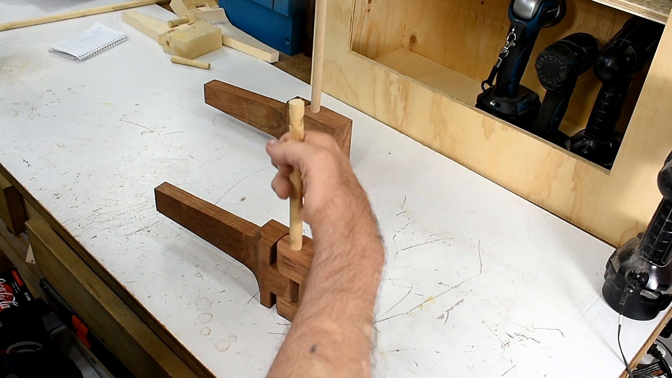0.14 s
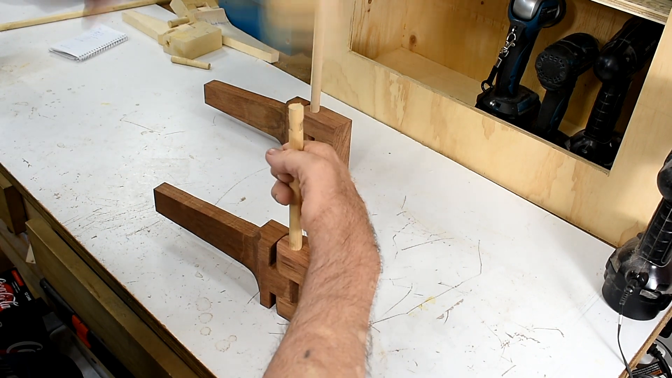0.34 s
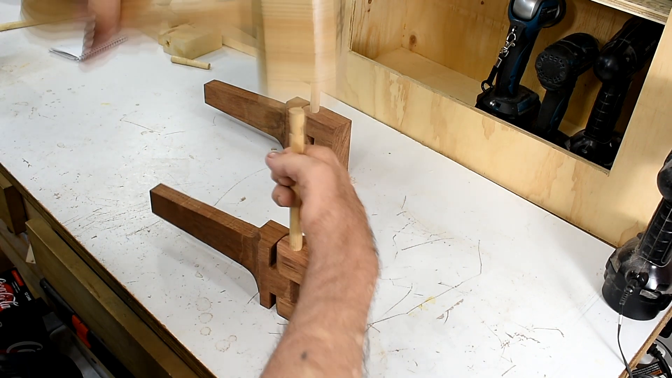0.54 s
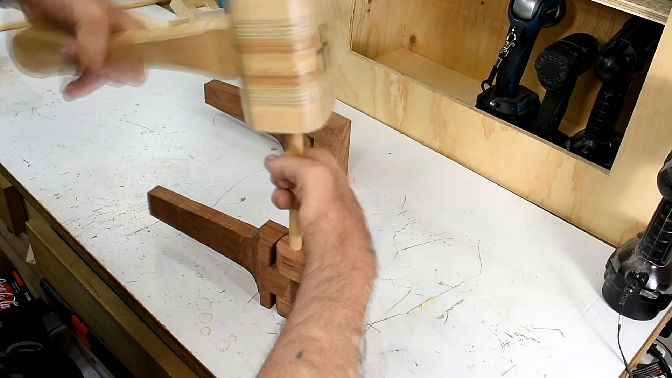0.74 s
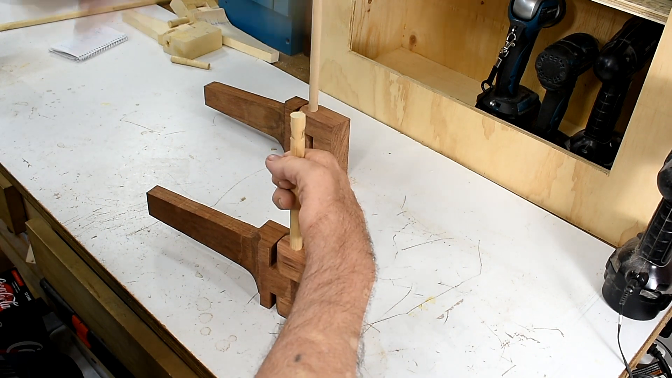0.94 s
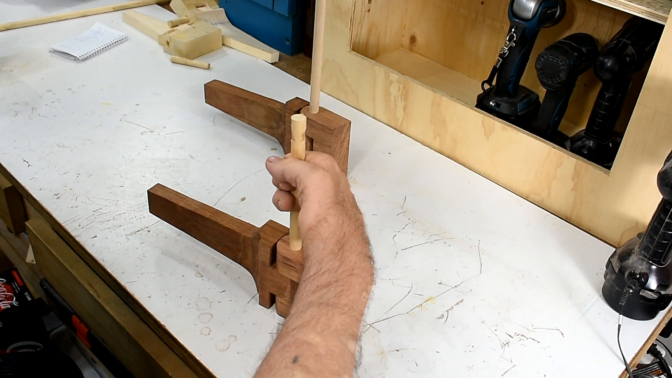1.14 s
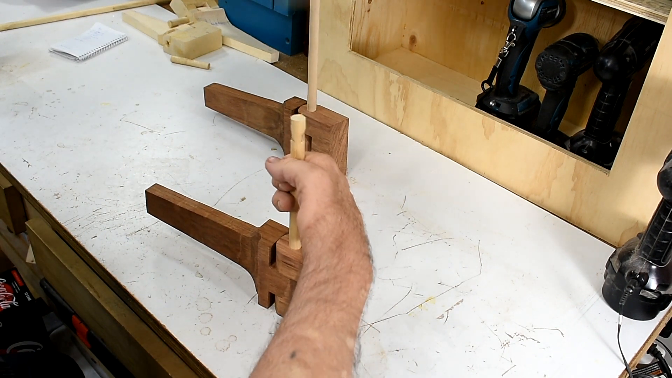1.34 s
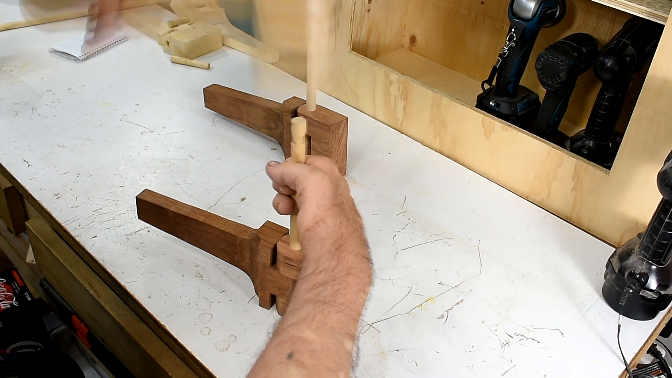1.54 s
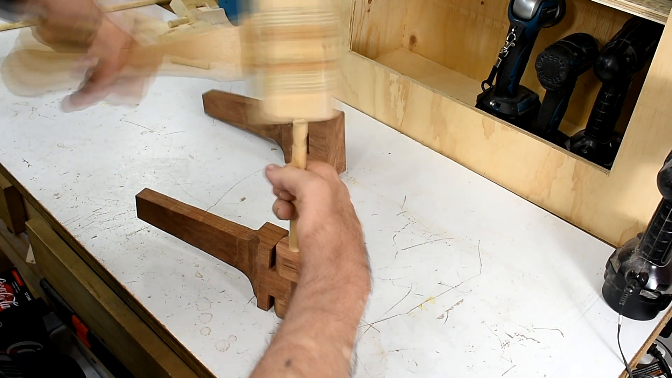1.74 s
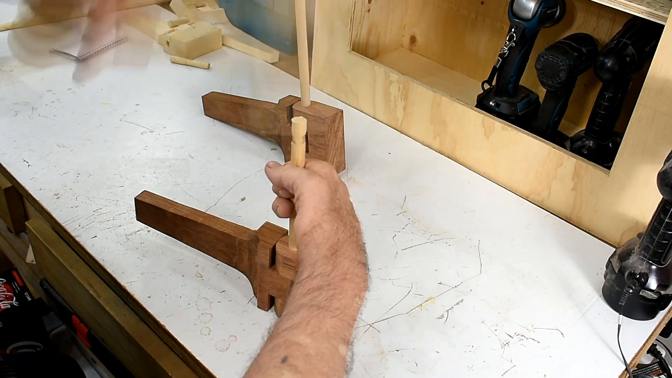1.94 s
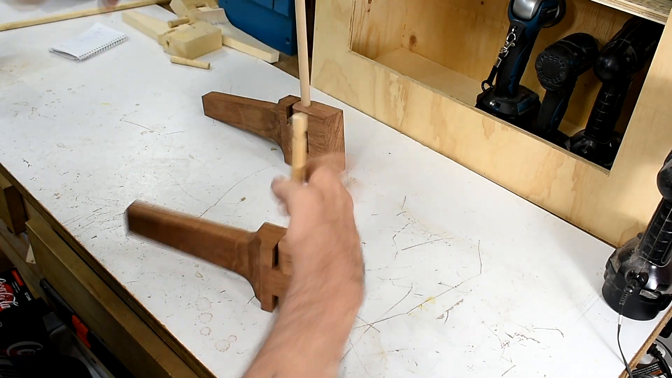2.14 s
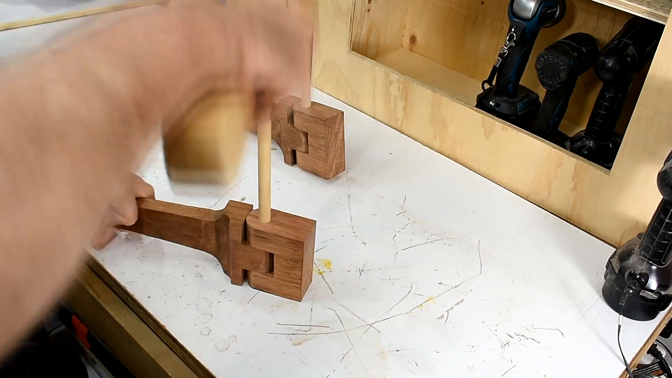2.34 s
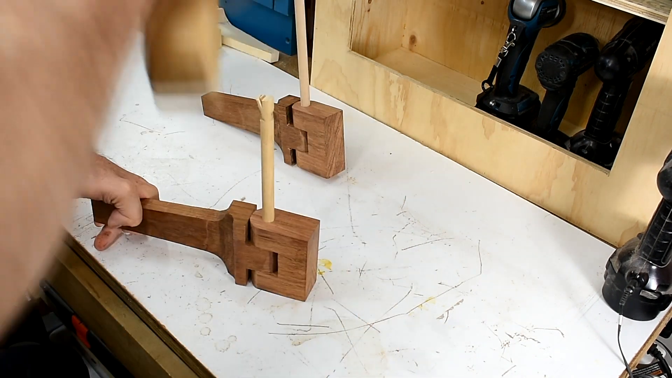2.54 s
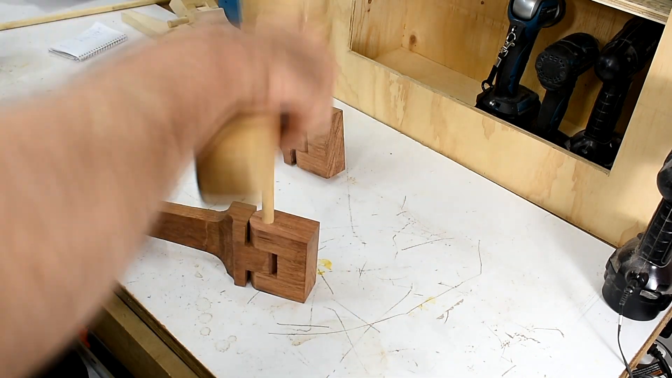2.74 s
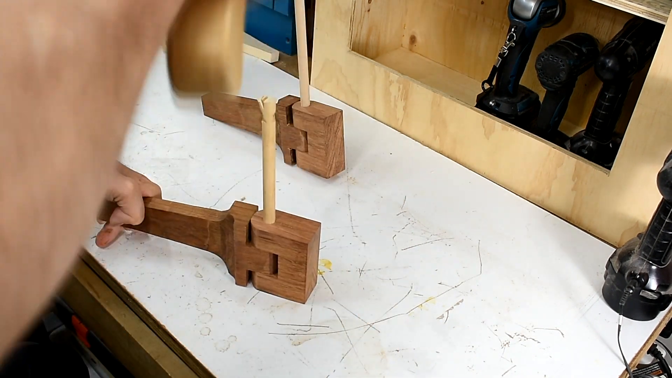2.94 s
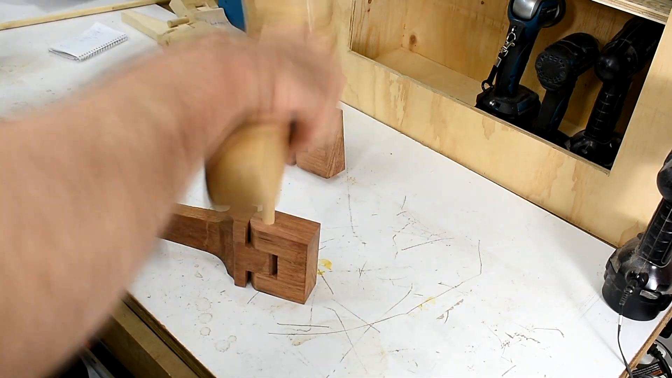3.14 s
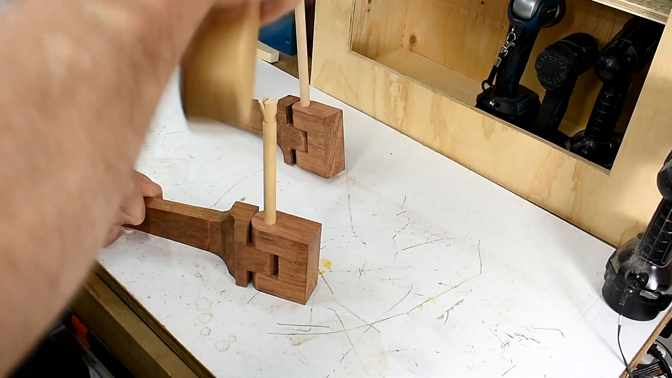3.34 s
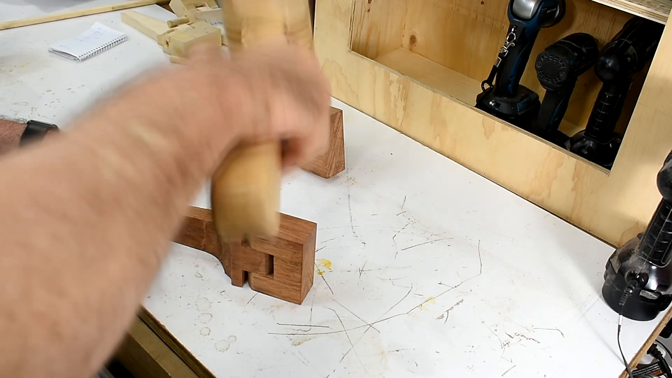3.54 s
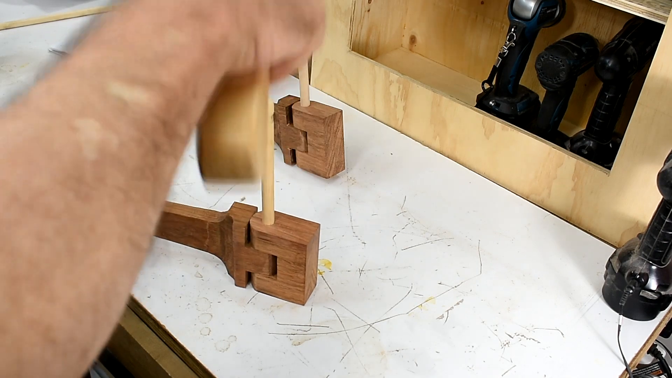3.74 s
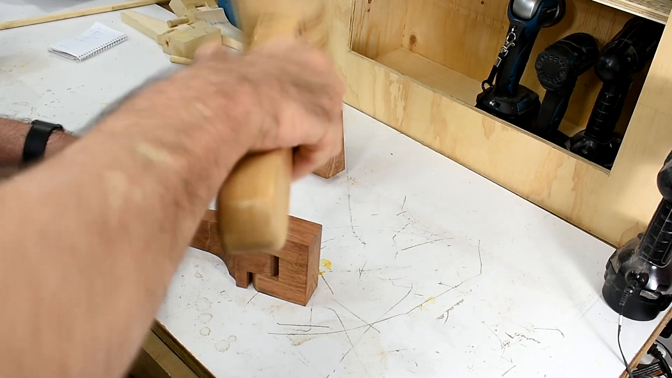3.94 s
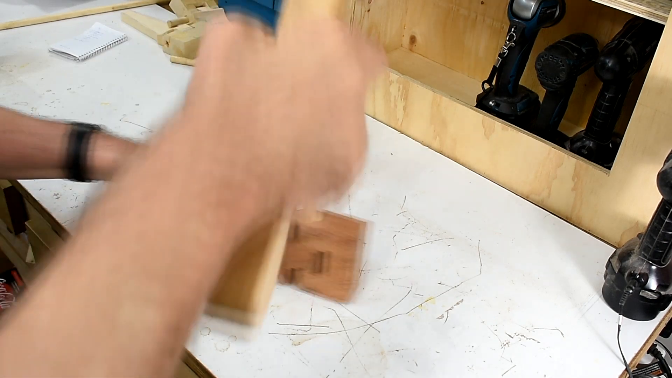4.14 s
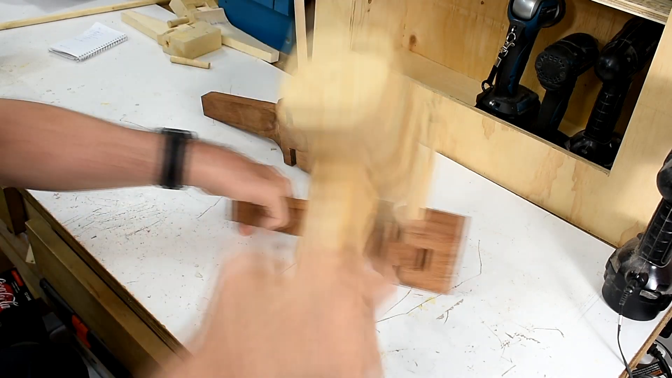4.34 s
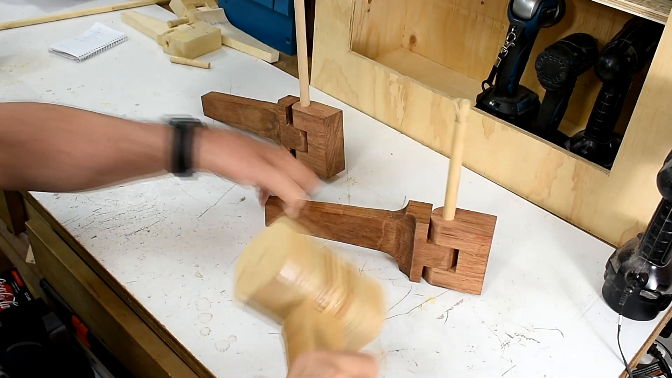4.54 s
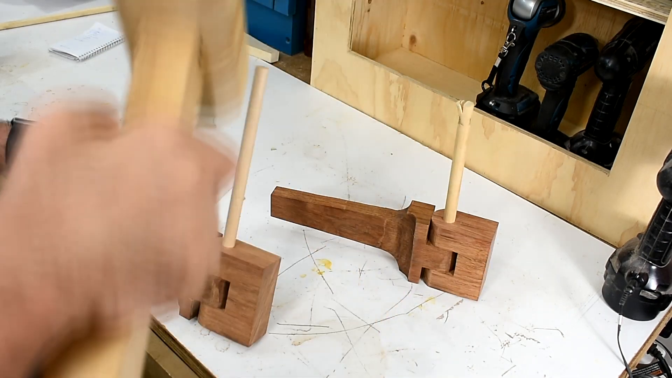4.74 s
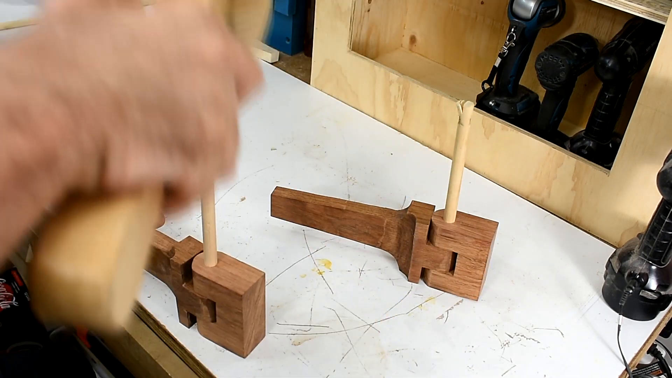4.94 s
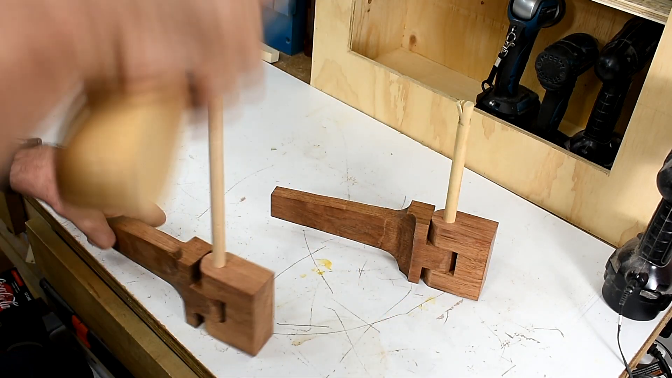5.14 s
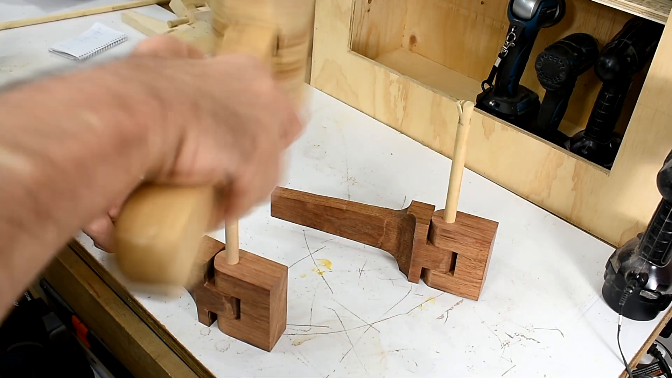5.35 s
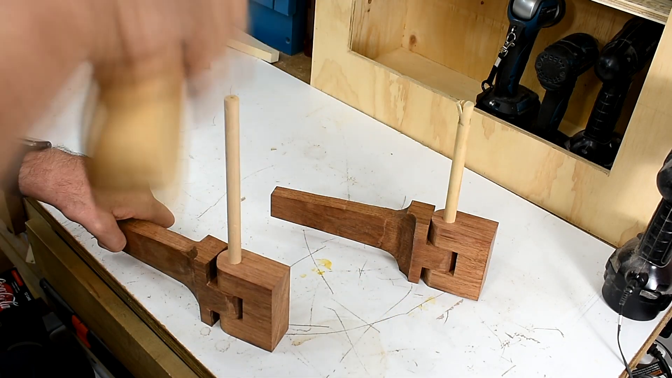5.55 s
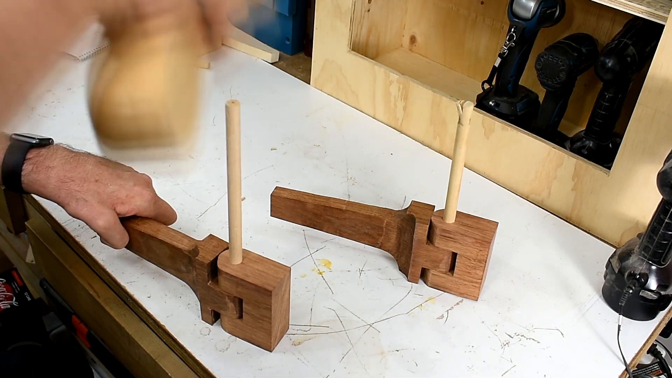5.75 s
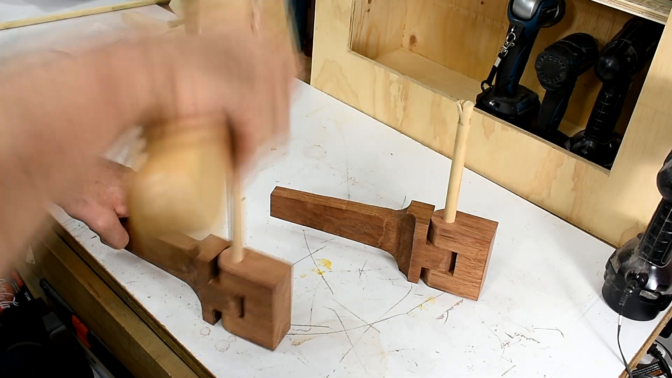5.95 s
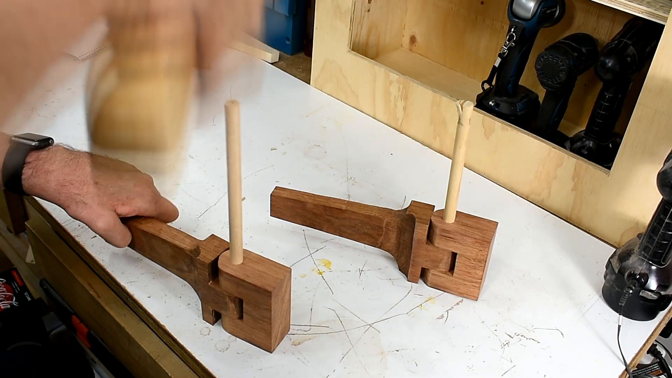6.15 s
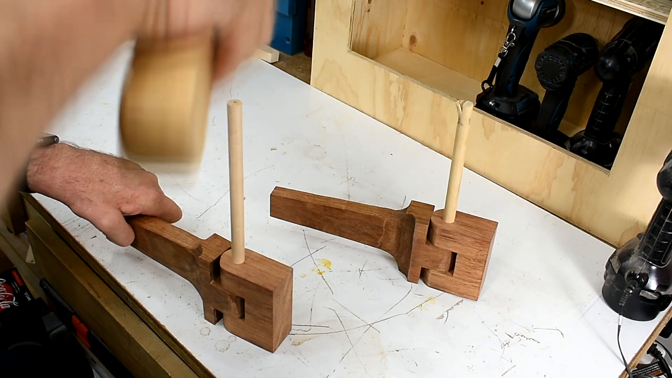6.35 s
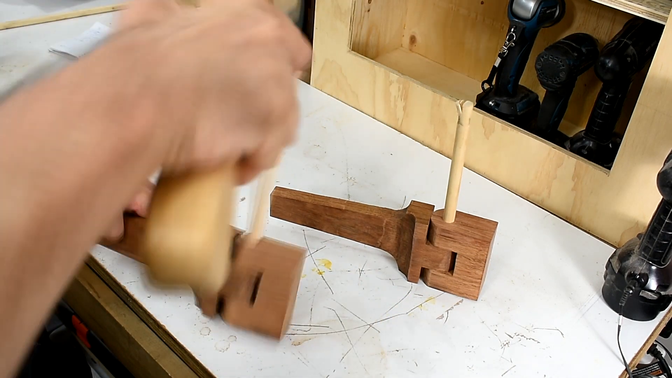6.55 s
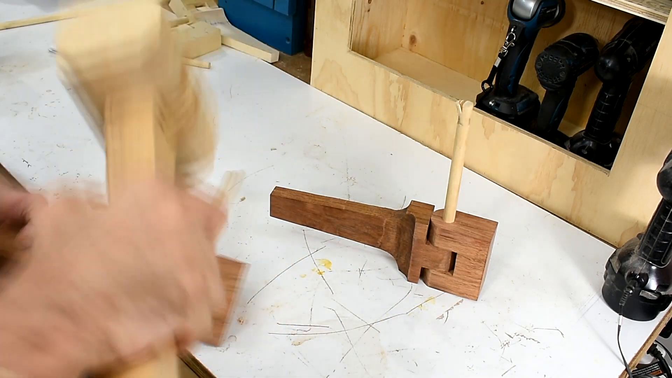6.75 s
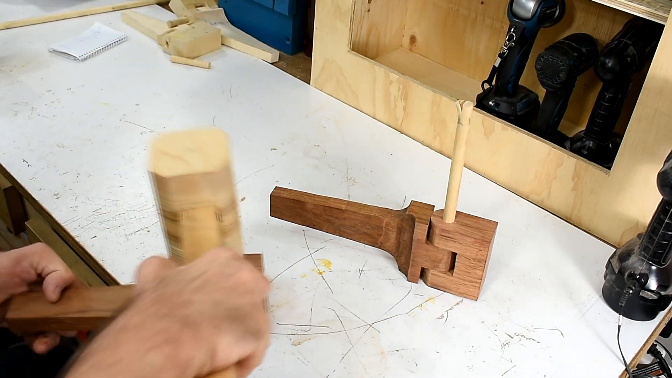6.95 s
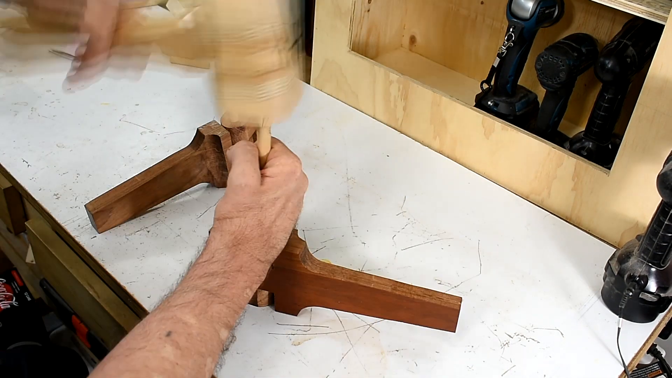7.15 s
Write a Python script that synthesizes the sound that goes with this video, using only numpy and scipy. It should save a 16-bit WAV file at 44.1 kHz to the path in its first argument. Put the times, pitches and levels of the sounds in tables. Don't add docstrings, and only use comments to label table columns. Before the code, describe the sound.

Close, mono, overloaded wooden hammering: a brisk run of bright taps with clipped, shortened tails, a slower run of deep hollow knocks, a few moments of sliding and setting down wood with a sharp glancing clack, then a final hurried run of heavier thuds. Every jolt makes loose metal tools buzz and hop on the bench. Short room reflections and a faint steady hum and hiss fill the gaps.

```python
import sys
import numpy as np
from scipy import signal
from scipy.fft import rfft, irfft
from scipy.io import wavfile
from scipy.ndimage import uniform_filter1d

SR = 44100
rng = np.random.default_rng(int(sys.argv[2]) if len(sys.argv) > 2 else 0)


def store_wav(level_fs):
    pcm = np.round(np.clip(np.atleast_2d(level_fs), -1, 1) * 32767)
    wavfile.write(sys.argv[1], SR, pcm.T.astype(np.int16))


def gain_from_db(level_db):
    decades = np.asarray(level_db, float) / 20
    return 10 ** decades


N = 317079

# pitch in Hz, t60 in seconds, level in dB in the first, second and third run.
BENCH_MODES = [(105, .3, -17.5, -11, -17), (147, .35, -8, -11, -1.5), (170.35, 0.29, -7.5, -13, 1),
               (237, 0.086, -13.5, 1.5, -6.5), (277.24, .3, -1, -12, 0), (347.3, 0.32, -1.5, 1, -1.5),
               (400, 0.081, -6, 10, -11), (450.5, 0.21, -3.5, -6.5, -3.5), (559, 0.29, 5.5, -1, -9),
               (706.6, 0.34, -7.5, -3.5, -27.5), (857, 0.34, 2, -1, -4.5), (924, 0.35, -2, -3, -3),
               (1148, 0.37, 0.5, 0.5, -9.5), (1303, 0.28, -2, -13, -6.5), (1429, 0.2, -6, -7.5, -2.5)]
# centre in Hz, width in Hz, level in dB.
TOOL_LOW = [(882, 110, -13), (1523, 71, -6.5), (1699, 36, -7), (2157.5, 150, -1.5), (2344, 100, -1),
            (2606, 150, -10)]
# centre in Hz, width in Hz, level in dB.
TOOL_HIGH = [(3146, 120, 2), (3467, 120, -8.5), (4700, 260, -24.5), (5260, 280, -20.5)]
# start in seconds, ring in dB, upper ring in dB, rattle t60 in seconds.
LANDINGS = [(0.2225, -26, -9, 0.056), (0.458, -28.5, -24, 0.067), (0.6938, -27.5, -11.5, 0.15),
            (0.9381, -25.5, 2, 0.17), (1.193, -27, 3, 0.18), (1.431, -21, -23, 0.13),
            (1.662, -32, -13, 0.096), (1.913, -29, -13, .12), (2.2602, -29.5, 7.5, 0.2),
            (2.667, -30, 2.5, 0.12), (2.944, -27, 9.5, 0.08), (3.3774, -29, -4, 0.24),
            (3.7722, -24, -12, 0.2), (4.066, -37, 21, 0.078), (4.2932, -28.5, -21, 0.049),
            (4.4283, -33, 3, 0.098), (4.6042, -29, 9.5, 0.18), (4.953, -45, 8.5, 0.11), (5.1, -42, 4, 0.12),
            (5.2403, -31.5, 1.5, 0.28), (5.3481, -19, 5.5, 0.29), (5.4185, -35.5, 23.5, 0.09),
            (5.548, -26.5, -8.5, 0.15), (5.575, -35.5, -7, 0.091), (5.82, -22.5, -4, 0.095),
            (6.104, -27, 4.5, 0.23), (6.381, -22, -8.5, 0.13), (6.6373, -45, 8, 0.25),
            (6.733, -25, -7, 0.16), (7.16, -37, -12, 0.11)]
# lower modes, 2.1 kHz mode, 2.4 kHz mode, crack, all in dB.
TOOL_LIE = [(-2.5, -1, 5.5, 4), (4.5, 3.5, -7, 7), (2, -1.5, 0.5, 1), (2.5, 4, 6, 4), (-3, -1.5, 1.5, 1),
            (-8.5, -1, 1, 3.5), (-1.5, -0.5, -3.5, 6), (1, 0, 1, -3.5), (-2.5, -2, 0, 4.5),
            (1.5, -4, -2.5, -6), (8, -10.5, 7, -5), (2, -5, 0.5, 0.5), (3.5, -3.5, 2.5, -1.5),
            (-8, -3, 3, 0), (3.5, 2, 6, 2), (7, -5, -11, 0), (-0.5, -2.5, -17, 8), (4, -1, -1, -0.5),
            (10.5, 3, -12, -6), (8, 0.5, 3, -9), (4, 2.5, 0, -4.5), (-2.5, -4, -13.5, -6),
            (5.5, -1.5, -3.5, -7.5), (8, -1, 6, -12.5), (5.5, -0.5, -4, -0.5), (7, -2, -1, 1),
            (2.5, -2.5, -1, 1), (-6, -8, -1, -3), (4, -2, -2.5, -7), (-4, -0.5, -5, 5)]
# start in seconds, ring in dB.
GLANCE = (5.3672, -13)
LEAD_BENDS = [0.33, 2.37, 2.6, 0.99, 2.53, 1.4, 1.7, 2.6, .95, 0.38, .42, 3.75, 0.22, .16]


def unit(x):
    return x / np.sqrt(np.mean(x ** 2))


def on_log_axis(table, hz):
    points_hz, values = np.transpose(table)
    return np.interp(np.log(np.maximum(hz, 1)), np.log(points_hz), values)


def band(x, low_hz, high_hz):
    return signal.sosfilt(signal.butter(2, [low_hz, high_hz], "bandpass", fs=SR, output="sos"), x)


def resonate(x, peaks):
    out = 0
    for hz, width_hz, db in peaks:
        b, a = signal.iirpeak(hz, hz / (2.2 * width_hz), fs=SR)
        out = out + gain_from_db(db) * signal.lfilter(b, a, signal.lfilter(b, a, x))
    return out


def add(out, x, s):
    i = int(round(s * SR))
    out[i:i + len(x)] += x[:N - i]


def rings(modes, t, scatter_db=2.0):
    ring = np.zeros(len(t))
    for hz, db, t60_s in modes:
        gain, detune, phase, beat_phase = rng.standard_normal(4)
        level = gain_from_db(db + scatter_db * gain - 60 * t / min(t60_s, .33))
        beat = 1 + 0.61 * np.sin(2 * np.pi * .025 * hz * t + 3 * beat_phase)
        ring += level * beat * np.sin(2 * np.pi * hz * (1 + .006 * detune) * t + .5 * phase)
    return ring / np.std(ring[:SR // 50])


def air():
    # frequency in Hz, density in dB per Hz.
    colour = [(18, -21), (30, -6), (60, -3), (140, -2.5), (295, -12.5), (999, -16), (2560, -23),
              (4590, -25.5), (13000, -23.5)]
    hz = np.arange(N // 2 + 1) * SR / N
    spectrum = rfft(rng.standard_normal(N)) * gain_from_db(on_log_axis(colour, hz)) / (1 + (hz / 9000) ** 4)
    return gain_from_db(-66.5) * unit(irfft(spectrum, N))


def rubbing():
    # peak pressure in seconds, easing in seconds, scrape in dB, lightness in dB.
    strokes = [(2.2, 0.15, -63.5, -1), (2.37, 0.17, -48, -12), (2.58, .08, -82, -1),
               (4.13, 0.53, -56.5, -2), (4.278, 0.059, -56.5, 9), (4.31, 0.1, -60.5, 2),
               (4.37, 0.18, -56.5, 6), (4.431, 0.12, -71, -2), (4.72, 0.25, -77.5, 18.5),
               (5.16, .1, -71.5, 9.5), (5.24, 0.13, -63, 4), (5.356, 0.024, -47, 15),
               (6.617, 0.15, -50.5, -9), (6.748, 0.12, -48.5, -14), (6.85, 0.23, -82, 22),
               (6.92, 0.12, -53.5, 2.5)]
    rumble_db, hiss_db, edge_db = -10.5, -10, -16
    rise_share = .25
    out, t = np.zeros(N), np.arange(N) / SR
    steps = np.repeat(rng.standard_normal(N // 256 + 1), 256)[:N]
    grain = gain_from_db(3.6 * uniform_filter1d(steps, size=128))
    rumble = unit(band(rng.standard_normal(N) * grain, 110, 650))
    scrape = unit(band(rng.standard_normal(N) * grain, 600, 2800))
    hiss = unit(band(rng.standard_normal(N) * grain, 3500, 10900))
    for s, ease_s, db, light_db in strokes:
        reach_s = np.where(t < s, rise_share * ease_s, ease_s)
        pressure = gain_from_db(db + edge_db * ((t - s) / reach_s) ** 2)
        out += pressure * (gain_from_db(rumble_db - light_db) * rumble + scrape + gain_from_db(hiss_db + light_db) * hiss)
    return out


def thuds():
    # start in seconds, level in dB, pitch in Hz, t60 in seconds.
    bumps = [(2.226, -58, 302, 0.12), (2.559, -48, 400, 0.074), (2.975, -39, 800, 0.07),
             (4.19, -48, 227, .15), (4.251, -42.5, 184, 0.22), (4.31, -51, 171, 0.2),
             (4.575, -44, 188, 0.15), (4.635, -52.5, 168.5, 0.093), (4.786, -45, 200, 0.14),
             (4.874, -28, 180, 0.18), (4.877, -33.5, 320, 0.083), (5.1, -61, 159, 0.1),
             (5.17, -48, 152, 0.22), (5.248, -49, 153, 0.22), (5.371, -27, 106, 0.24),
             (5.378, -13.5, 263, 0.096), (5.564, -45, 150, .12), (6.7, -39, 387, 0.23),
             (6.76, -33, 343, 0.11), (6.819, -42, 356, 0.082), (6.95, -33, 166, 0.16),
             (7.008, -41.5, 240, 0.12)]
    out, t = np.zeros(N), np.arange(SR // 2) / SR
    for s, db, hz, t60_s in bumps:
        near = [(row[0], -9 * abs(np.log2(row[0] / hz)), t60_s) for row in BENCH_MODES[:8]]
        ring = rings(near + [(hz, 1.5, t60_s)], t, scatter_db=3.0)
        add(out, gain_from_db(db - 6.0) * ring * (1 - np.exp(-t / 0.0067)), s)
    return out


def sheen():
    # centre in Hz, width in Hz, level in dB.
    jingle = [(9800, 460, -5), (10200, 200, -5), (11800, 600, -12)]
    out, t = np.zeros(N), np.arange(SR // 4) / SR
    noise = unit(resonate(rng.standard_normal(len(t)), jingle))
    add(out, gain_from_db(-31.5 - 60 * t / 0.1) * noise, GLANCE[0])
    return out


def contacts():
    # start in seconds, ring in dB.
    bounces = [(.2354, -38.5), (0.449, -35), (0.472, -34.5), (0.717, -35.5), (0.931, -36.5), (1.184, -29),
               (1.23, -31.5), (1.6775, -41), (2.296, -55), (1.735, -33), (2.972, -33.5), (2.997, -42.5),
               (3.411, -46), (4.297, -39), (4.304, -44), (4.607, -33.5), (4.949, -43.5), (4.719, -57),
               (5.219, -46), (5.58, -38), (5.358, -36), (0.22, -44.5), (.2415, -45), (.2505, -43.5),
               (6.742, -32.5), (6.12, -39.5), (6.392, -26), (5.398, -39), (3.396, -36.5), (3.451, -35),
               (3.787, -31), (4.329, -35), (4.351, -36), (4.62, -38), (4.635, -40.5), (4.6548, -42),
               (4.67, -39), (5.2104, -42.5), (5.246, -36), (5.268, -44), (5.282, -38.5), (5.335, -35),
               (5.493, -33), (6.136, -37), (6.174, -39), (6.409, -28.5)]
    # start in seconds, ring in dB, crack in dB.
    touches = [(0, -43.5, -12), (1.678, -44.5, -3), (1.931, -46, 4), (1.939, -44, 4), (2.204, -68, -9),
               (2.332, -39, -4), (2.49, -61, 14), (2.548, -39, -25), (2.562, -40.5, -4), (2.574, -47, -18),
               (2.979, -42, -29), (3.063, -45, -33), (4.2028, -42.5, -8), (4.399, -43, -9),
               (4.7065, -44, -14), (4.7987, -59, 3), (4.8384, -53.5, -9), (4.875, -39.5, 5.5),
               (5.565, -54, 4), (5.42, -36, 10), (6.757, -29, 2.5), (6.818, -47, -15), (6.862, -64, 10),
               (7.001, -43, -24), (7.006, -41.5, -24)]
    # upper ring, wood, crack, all in dB.
    glance_db = (2, -4.5, -3)
    out = [(s, db, upper_db, -11.5, -19.5 + lie[3], t60_s)
           for (s, db, upper_db, t60_s), lie in zip(LANDINGS, TOOL_LIE)]
    out += [(s, db, -7.5, -11, -21.5, 0.044) for s, db in bounces]
    out += [(s, db, 2, 2, crack_db, .14) for s, db, crack_db in touches]
    return out + [(*GLANCE, *glance_db, 0.12)]


def tool_ring(push):
    starts_s = np.array(LANDINGS)[:, 0] - .015
    latest = np.maximum(np.searchsorted(starts_s, np.arange(N) / SR) - 1, 0)
    lower_db, mid_db, upper_db, _ = np.array(TOOL_LIE)[latest].T
    shares_db = [lower_db, lower_db, lower_db, mid_db, upper_db, 0]
    return sum(resonate(push * gain_from_db(db), [mode]) for mode, db in zip(TOOL_LOW, shares_db))


def hops():
    # centre in Hz, width in Hz, level in dB.
    thin_steel = [(2365, 14, 12), (3155, 13, 9.5)]
    # centre in Hz, width in Hz, level in dB.
    crack_parts = [(3930, 130, 0.5), (4900, 200, -4.2)]
    push, tick, t = np.zeros((4, N)), np.zeros((4, N)), np.arange(SR // 2) / SR
    for s, db, upper_db, wood_db, crack_db, t60_s in contacts():
        rattle = gain_from_db(-60 * (t / max(t60_s, .02)) ** 1.5)
        normal_speed = 2.2 < s < 5.45 or 6.7 < s < 7.1
        if normal_speed:
            first, tick_db = gain_from_db(-4.5 - 60 * t / 0.025), 12.5
        else:
            first, tick_db = gain_from_db(-7.5 - 60 * t / 0.05) * (1 - np.exp(-t / 0.0011)), 9
        parts_db = np.array([0, upper_db, wood_db, crack_db])
        for row, part_db, rattle_db in zip(push, parts_db, (-14.0, -18.5, -8.0, -12.5)):
            add(row, gain_from_db(db + part_db) * (first + gain_from_db(rattle_db) * rattle), s + 0.0004)
        tick[:, int((s + .0008) * SR)] = gain_from_db(db + tick_db + parts_db)
    steps = np.repeat(rng.standard_normal((4, N // 128 + 1)), 128, axis=1)[:, :N]
    flutter = uniform_filter1d(steps, size=96)
    low, high, wood, crack = push * rng.standard_normal((4, N)) * gain_from_db(4 * flutter) + tick
    tool = gain_from_db(12.5) * tool_ring(low) + gain_from_db(-3.5) * band(band(low, 1000, 3900), 1000, 3900)
    tool += gain_from_db(6) * resonate(high, TOOL_HIGH) + resonate(low + high, thin_steel)
    bench = gain_from_db(2.5) * band(band(wood, 250, 2500), 250, 2500)
    crackle = gain_from_db(-1.0) * band(crack, 3500, 7200) + resonate(crack, crack_parts)
    direct = tool + bench + crackle
    walls = band(rng.standard_normal(len(t)), 200, 3600) * gain_from_db(-60 * t / 0.35) * (1 - np.exp(-t / 0.0029))
    return direct + gain_from_db(-41.5) * signal.fftconvolve(direct, walls)[:N]


def seat(k, size):
    # block, block overtone, dowel, dowel overtone, all in Hz.
    seat_hz = [(350, 842, 2011, 3031), (460, 1147, 2441, 2896), (463, 1157, 1863, 2947),
               (463, 1160, 2207, 3033), (466, 1157, 2347, 3149), (285, 1160, 2560, 2929),
               (545, 1160, 2097, 3136), (498, 1152, 2121, 3004), (479, 1128, 2627, 2721),
               (345, 1628, 2385, 2974), (450, 1120, 2396, 3688), (474, 929, 2229, 3001),
               (401, 1491, 2312, 2998), (285, 1106, 2167, 3090), (275, 1445, 2239, 3117),
               (301, 1577, 2051, 3163), (249, 1451, 2258, 3047), (252, 972, 2258, 3160),
               (228, 1128, 2544, 3601)]
    seat_db = [(-16.5, -1, -10.5, -16), (-16, -8, -13, -6.5), (-13, -7.5, -12.5, -20),
               (-10, -7.5, -11.5, -15), (-16, -4.5, -11.5, -10.5), (-8.5, -6, -2.5, -10),
               (-10, -10, 0.5, 0.5), (-7.5, -9, -9.5, -5.5), (-7.5, -10.5, -3, -6),
               (-12, -9.5, -15.5, -2.5), (-17.5, -6.5, -9.5, -10.5), (-13, -6, -9, -11),
               (-10.5, -11.5, -17.5, -7.5), (-9, -4.5, -8.5, -11), (-2.5, -7.5, -10.5, -6),
               (-5, -7, -15.5, -10), (-1.5, -8.5, -10.5, -10.5), (-5.5, -5, -8, -7), (0.5, -3.5, -15, -8.5)]
    seat_t60_s = (.28, 0.23, 0.32, .24)
    t, out = np.arange(size) / SR, np.zeros(size)
    for hz, db, t60_s in zip(seat_hz[k], seat_db[k], seat_t60_s):
        beat = 1 + 0.38 * np.cos(2 * np.pi * 0.021 * hz * t + k)
        out += gain_from_db(db - 60 * t / t60_s) * np.sin(2 * np.pi * hz * t) * beat
    return out * (1 - np.exp(-t / 0.00076))


def blow(body, run, dowel, same, weight_db, spot, bench_db, dowel_db, tools_db, crack_db):
    # frequency in Hz, t60 in seconds.
    room_t60 = [(60, 0.37), (160, 0.24), (420, 0.39), (1100, 0.37), (2900, 0.4), (7700, 0.3), (15000, 0.29)]
    room_db = (-1, -0.5, -1)
    # centre in Hz, width in Hz, level in dB.
    buzz_top = [(5530, 290, -15.5), (7540, 630, -25.5)]
    buzz_run_db = (1.9, 2.5, 0)
    deep_db, mode_560_db, upper_modes_db, buzz_db, treble_db = spot
    size = len(same)
    t, hz = np.arange(size) / SR, np.arange(size // 2 + 1) * SR / size
    colour_db = on_log_axis(body, hz) + weight_db / (1 + (hz / 900) ** 2)
    colour_db += deep_db / (1 + (hz / 180) ** 4) + treble_db / (1 + (3800 / np.maximum(hz, 1)) ** 4)
    noise = rfft(.6 * same + .8 * rng.standard_normal(size)) * gain_from_db(colour_db)
    room = np.zeros(size)
    for octave in np.arange(5, 14.1, .5):
        share = np.clip(1 - 2 * np.abs(np.log2(np.maximum(hz, 1)) - octave), 0, 1)
        rise = 1 - np.exp(-t * 2 ** octave / 2.8)
        room += irfft(noise * share, size) * rise * gain_from_db(-60 * t / on_log_axis(room_t60, 2 ** octave))
    spot_db = [deep_db] * 3 + [0] * 5 + [mode_560_db] + [upper_modes_db] * 6
    bench_modes = [(row[0], row[2 + run] + db, row[1]) for row, db in zip(BENCH_MODES, spot_db)]
    bench = rings(bench_modes, t, scatter_db=1.57) * (1 - np.exp(-t / 0.0037))
    crack = band(rng.standard_normal(size), 1200, 8800) * gain_from_db(-60 * t / 0.0067)
    loose = TOOL_LOW + [(f, width, db - 3) for f, width, db in TOOL_HIGH]
    loose = loose + [(f, width, db + buzz_run_db[run]) for f, width, db in buzz_top]
    shifted = [(f * (1 + .015 * rng.standard_normal()), width, db) for f, width, db in loose]
    tools = unit(resonate(rng.standard_normal(size), shifted)) * gain_from_db(-60 * t / (.4, .4, .42)[run])
    wood = gain_from_db(bench_db + weight_db) * bench + gain_from_db(dowel_db) * rings(dowel, t)
    room *= gain_from_db(room_db[run]) / np.std(room[:SR // 50])
    return room + wood + gain_from_db(tools_db + buzz_db) * tools + gain_from_db(crack_db) * crack


def overload(x, db, contact_s):
    t = np.arange(len(x)) / SR
    x = x * gain_from_db(db) * (1 - np.exp(-(t / contact_s) ** 2)) * (1 + 2.0 * np.exp(-t / 0.011))
    flat = x / (1 + np.abs(x) ** 14) ** (1 / 14)
    return signal.lfilter([1, -1], [1, -np.exp(-2 * np.pi * 22 / SR)], flat)


def scramble(x, depth=0.56):
    for lag in (7, 17, 31):
        top, bottom = np.zeros(lag + 1), np.zeros(lag + 1)
        top[0], top[lag] = -depth, 1
        bottom[0], bottom[lag] = 1, -depth
        x = signal.lfilter(top, bottom, x)
    return x


def hurry(x, s, lead_s, bend):
    # time in seconds, playback speed as a ratio.
    speeds = [(0, 2.04), (.5, 1.92), (1.1, 1.9), (1.5, 1.906), (2.1, 1.906), (5.65, 1.37), (5.92, 1.65),
              (6.24, 1.68), (6.46, 1.52), (7.2, 2.56)]
    speed = np.interp(s, *np.transpose(speeds))
    hop, reach = int(.03 * SR), SR // 250
    x = np.r_[np.zeros(int(lead_s * SR)), x, np.zeros(SR // 2)]
    out, skip, loose = np.zeros(len(x)), 0, scramble(x)
    for k in range(12):
        u = np.arange(len(x)) / hop - k
        fade_in = np.clip(1 + u, 0, 1)
        if k == 1:
            fade_in = 1.35 * fade_in ** bend
        fade_out = np.sqrt(1 - np.clip(u, 0, 1) ** (2 * bend if k == 0 else 2))
        source = x if k == 1 else loose
        out += fade_in * fade_out * np.r_[source[skip:], np.zeros(skip)]
        here, ahead = k * hop + skip, int((k + 1) * hop * speed) - hop - reach
        match = np.correlate(x[ahead:ahead + hop + 2 * reach], x[here:here + hop])
        skip = ahead - k * hop + np.argmax(match)
    return out


def knocks():
    # start in seconds, ceiling in dB, overload in dB, weight in the bench in dB.
    events = [
        (2.341, -15, -14.5, 1),
        (2.694, -8.5, -2, 2),
        (3.108, -9, 0, -0.6),
        (3.502, -9, 0.5, -0.4),
        (3.883, -9, -1, 2.5),
    ]
    # deep thump, 560 Hz mode, modes above it, tool buzz, treble, all in dB.
    spots = [(8, 0.5, 6.5, 0, -2), (1, 3.5, -2, 1.5, 3), (1.5, 6.5, 3, 0.5, 0), (0.5, 0, -3, -3.5, -0.5),
             (0.5, -3.5, -2, 1.5, 1)]
    # frequency in Hz, density in dB per Hz.
    body = [(18, -74.5), (30, -30.5), (49, -30.5), (141, -2.5), (266, -1), (345, -0.5), (649, -5.5),
            (844, 0.5), (913, 0), (1320, -3.5), (5590, -18), (9970, -27.5), (16000, -53)]
    # pitch in Hz, level in dB, t60 in seconds.
    modes = [(1732, -2.5, 0.16), (1730, -18.5, 0.77), (2310, -14, 0.53), (2700, -1.5, 0.55),
             (2880, 3.5, 0.56), (3430, -8, 2.3), (4430, -21.5, 0.23)]
    out, same = np.zeros(N), rng.standard_normal(20480)
    for k, ((s, top_db, over_db, weight_db), spot) in enumerate(zip(events, spots)):
        hit = blow(body, 1, modes, same, weight_db, spot,
                   bench_db=-1.5, dowel_db=-14.5, tools_db=-10.0, crack_db=-19.5)
        add(out, gain_from_db(top_db) * overload(hit + seat(k, len(hit)), over_db, contact_s=0.00072), s)
    return out


def taps():
    # start in seconds, ceiling in dB, overload in dB, lead-in in seconds, weight in the bench in dB.
    events = [
        (0.0519, -7.5, -14.5, 0.012, 0),
        (0.286, -8.5, -8, 0.014, -4),
        (0.524, -8, -6.5, 0.015, -4.5),
        (0.775, -7, -7.5, 0.01, -5),
        (1.018, -8.5, -3.5, 0.016, -2),
        (1.27, -6.5, -5.5, 0.013, 2),
        (1.5087, -7.5, 1.5, 0.012, 1),
        (1.758, -8, 1, 0.016, 3.5),
        (2.006, -7.5, -1, 0.01, 3),
    ]
    # deep thump, 560 Hz mode, modes above it, tool buzz, treble, all in dB.
    spots = [(4, 7, 1.5, 2, 0), (5, 1.5, -5.5, 4, 0), (6.5, 1.5, -30, 0.5, 0.52),
             (6.5, 7.5, -6.5, -3, 0.56), (9, -19, -1, -0.5, 0), (3, 3, 0, -3, 0.88),
             (-1, 6.5, 2.5, -5.5, 0.38), (-5, 0, -0.5, 1, 0), (-2.5, -6, 0.5, -2, 0.11)]
    # frequency in Hz, density in dB per Hz.
    body = [(18, -51), (30, -18), (138, 1), (205, -1.5), (287, -3), (415, -4), (649, -5), (822, -4),
            (1250, -9.5), (2350, -8.5), (3400, -9), (7090, -17), (16000, -42.5)]
    # pitch in Hz, level in dB, t60 in seconds.
    modes = [(1625, 3, 0.31), (2189, 3, 0.27), (2283, -15, 0.15), (2972, -8.5, 0.52), (3260, -6.5, 0.17),
             (3837, -8, 0.13), (3500, -20, 0.075)]
    grips_hz = [2387, 2156, 2230, 2460, 2275, 2449, 2240, 2300, 2120]
    out, same = np.zeros(N), rng.standard_normal(20480)
    rows = zip(events, grips_hz, spots, LEAD_BENDS[:9])
    for k, ((s, top_db, over_db, lead_s, weight_db), grip_hz, spot, bend) in enumerate(rows, start=5):
        hit = blow(body, 0, modes + [(grip_hz, 8, 0.37)], same, weight_db, spot,
                   bench_db=-2.0, dowel_db=-6.5, tools_db=-5.0, crack_db=7.5)
        hit = overload(hit + seat(k, len(hit)), over_db, contact_s=0.00028)
        add(out, gain_from_db(top_db) * hurry(hit, s, lead_s, bend), s - lead_s)
    return out


def drives():
    # start in seconds, ceiling in dB, overload in dB, lead-in in seconds, weight in the bench in dB.
    events = [
        (5.649, -7, -7, 0.0051, -2),
        (5.922, -6.5, 1.5, 0.0061, 3.5),
        (6.236, -9.5, 1.5, 0.02, 10.5),
        (6.458, -7, -1.5, 0.0049, 2),
        (7.181, -7, -3, 0.0046, 2.5),
    ]
    # deep thump, 560 Hz mode, modes above it, tool buzz, treble, all in dB.
    spots = [(12, -8.5, 4.5, 4.5, 2.5), (0, 10.5, 0.5, 1, 0), (-5.5, 3, -2, -3.5, -1.5),
             (-1.5, -7.5, -8.5, -2, 0.5), (1, -0.5, 2, 2, -8.5)]
    # frequency in Hz, density in dB per Hz.
    body = [(18, -70.5), (30, -49), (134, -2), (205, -2.5), (270, 0.5), (470, -5), (554, -4), (937, -8),
            (2060, -8.5), (2230, -8.5), (6210, -20), (10200, -31), (16000, -58)]
    # pitch in Hz, level in dB, t60 in seconds.
    modes = [(1773, 0.5, 0.11), (2250, -6, 0.35), (3040, -1, 0.23), (3310, 6.5, 0.15), (3530, -9, 0.081),
             (3590, -7.5, 0.35), (4530, -8, 0.058)]
    out, same = np.zeros(N), rng.standard_normal(20480)
    rows = zip(events, spots, LEAD_BENDS[9:])
    for k, ((s, top_db, over_db, lead_s, weight_db), spot, bend) in enumerate(rows, start=14):
        hit = blow(body, 2, modes, same, weight_db, spot,
                   bench_db=-6.0, dowel_db=-9.0, tools_db=-6.5, crack_db=-9.5)
        hit = overload(hit + seat(k, len(hit)), over_db, contact_s=0.00056)
        add(out, gain_from_db(top_db) * hurry(hit, s, lead_s, bend), s - lead_s)
    return out


def scene():
    # time in seconds, half width in seconds, time until old tails are gone in seconds.
    splice = (4.69, .005, .05)
    change_s, half_width_s, tail_s = splice
    since_s = np.arange(N) / SR - change_s
    dip = 1 - .75 * np.exp(-(since_s / half_width_s) ** 2)
    cut = 1 - .9 * (since_s > 0) * np.exp(-(since_s / tail_s) ** 2)
    background = air() + rubbing() + thuds() + sheen() + cut * hops()
    mix = dip * (background + knocks() + taps() + drives())
    return mix[None]


def band_limit(x):
    return signal.sosfilt(signal.butter(12, 16640, fs=SR, output="sos"), x)


def record(dry):
    top_cut = signal.ellip(8, .2, 70, 15800, fs=SR, output="sos")
    return band_limit(signal.sosfilt(top_cut, np.clip(dry, -.92, .92)))


dry = scene()
out = record(dry)
store_wav(out)
```